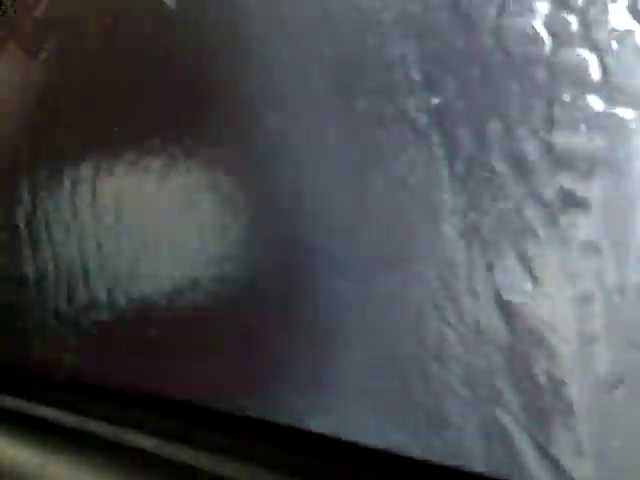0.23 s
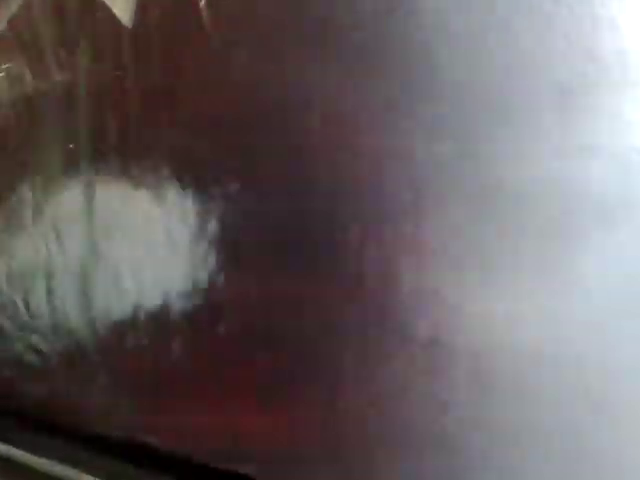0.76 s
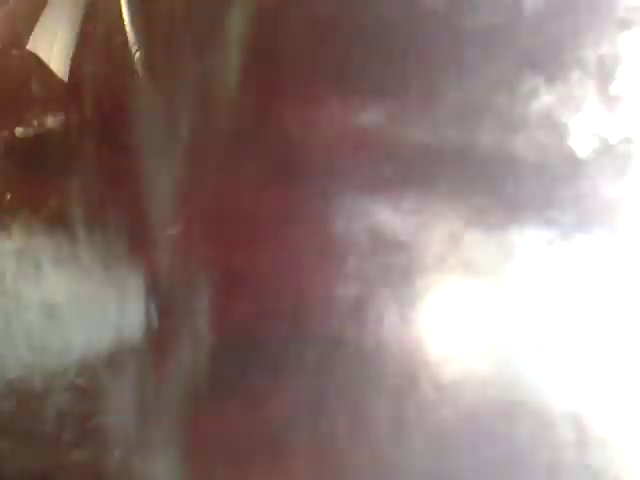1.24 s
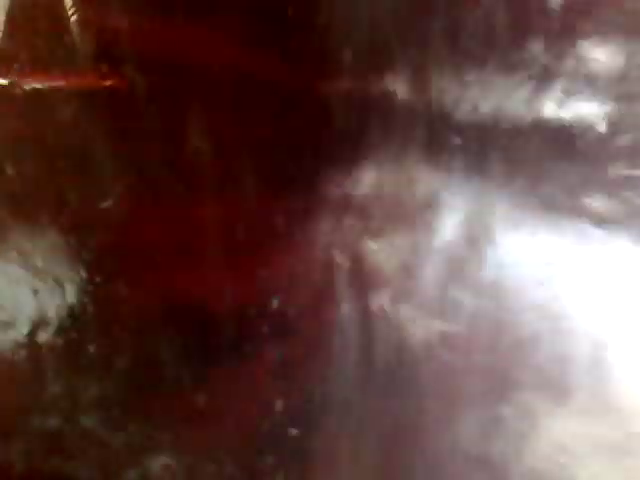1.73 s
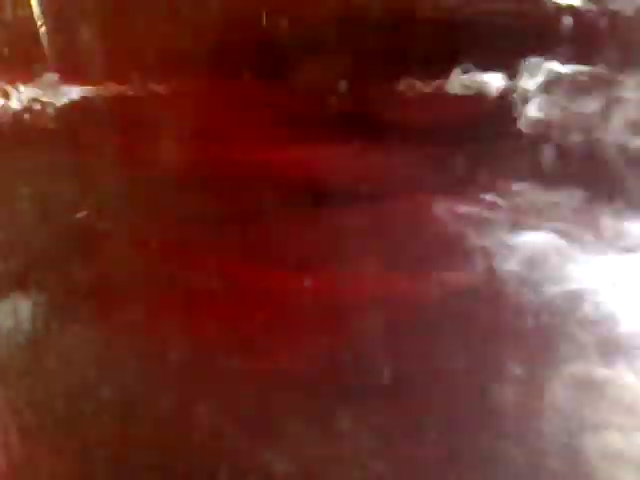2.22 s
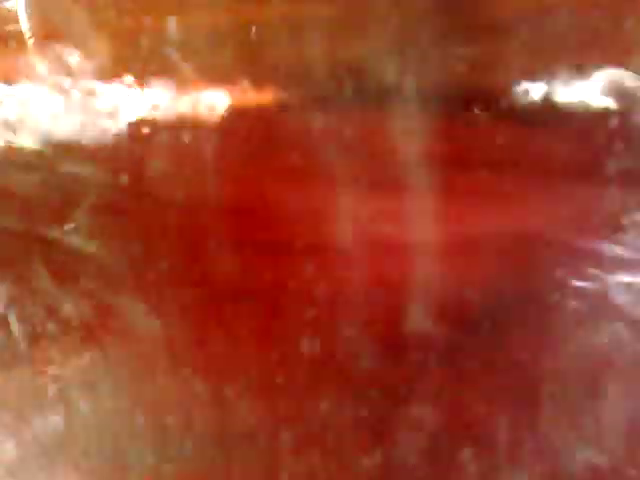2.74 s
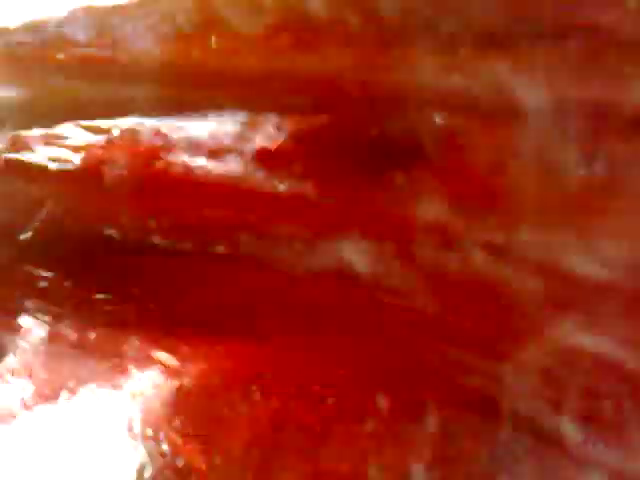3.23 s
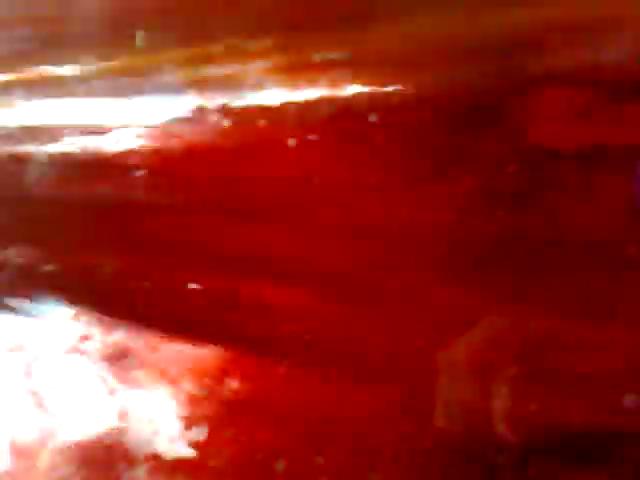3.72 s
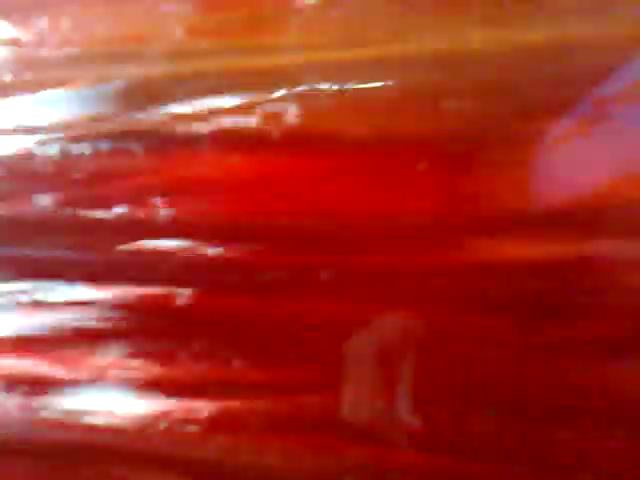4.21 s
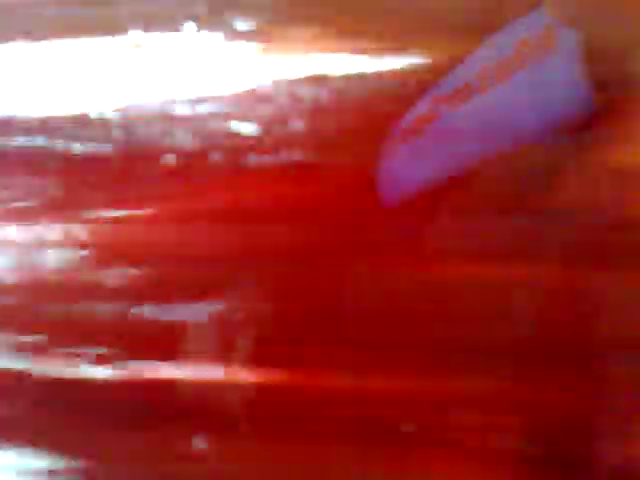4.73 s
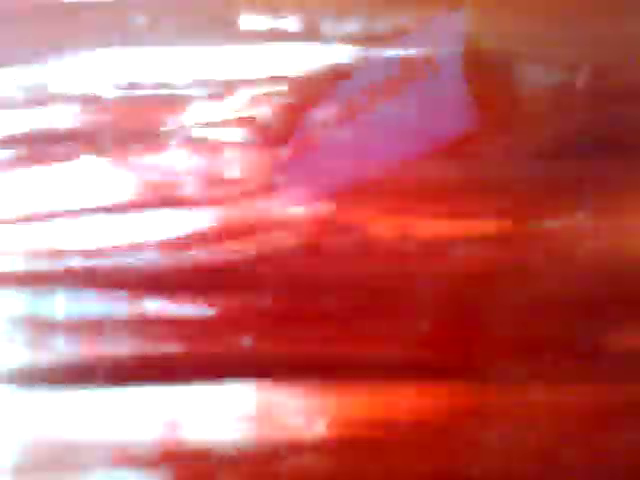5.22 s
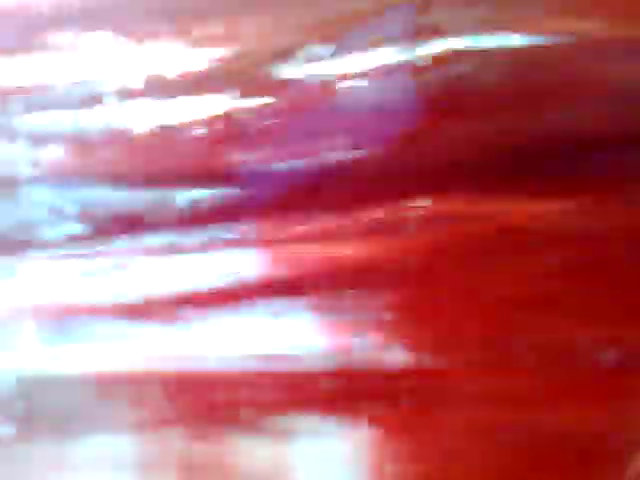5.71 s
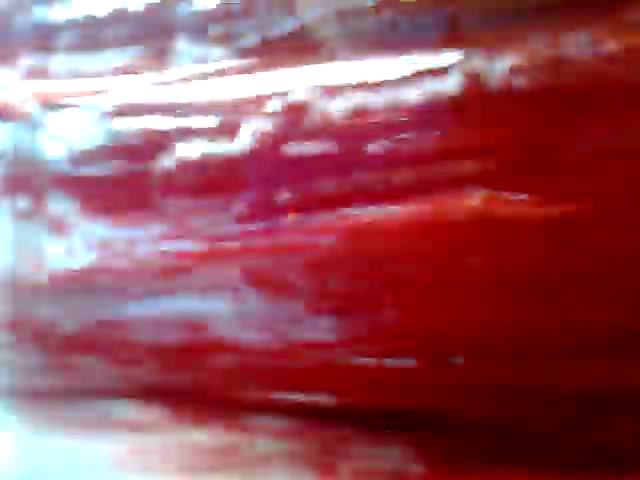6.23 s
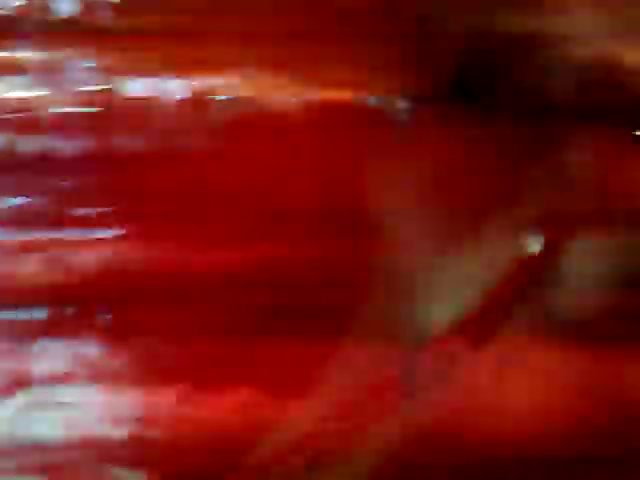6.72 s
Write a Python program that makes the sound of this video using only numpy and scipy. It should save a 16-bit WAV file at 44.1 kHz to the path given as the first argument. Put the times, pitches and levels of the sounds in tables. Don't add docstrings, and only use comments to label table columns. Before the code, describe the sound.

A short roar of water jets cuts out, then a big wet cloth brush scrubs and drums steadily on a car, loud, muffled and overdriven.

```python
import sys
import numpy as np
from scipy import signal
from scipy.fft import rfft, irfft
from scipy.io import wavfile
from scipy.ndimage import uniform_filter1d

SR = 44100
rng = np.random.default_rng(int(sys.argv[2]) if len(sys.argv) > 2 else 0)


def generate_wav(signal):
    frames = np.transpose(np.atleast_2d(signal))
    scaled = np.clip(frames, -1, 1) * 32767
    pcm = np.round(scaled).astype(np.int16)
    wavfile.write(sys.argv[1], SR, pcm)


def amplitude_ratio(level_db):
    exponent = np.asarray(level_db, float) / 20
    return 10 ** exponent


N = 306936
BAND_EDGE_HZ = 3720
SILENT_S, GAP_DB = 0.2405, -72

# t/s, level/dB
PRESSURE = [(0.3, 0), (1.4, -0.5), (1.85, -0.5), (2.15, -3), (2.4, -4), (2.66, 0), (3.1, 0), (3.4, 1),
            (4.1, 1), (4.42, -4.5), (4.66, 0.5), (5.2, -0.5), (6.0, 0), (6.19, 2.5), (6.33, 0), (6.7, 0.5),
            (6.85, 2.5), (6.96, -2)]


def rms_one(x):
    return x / np.sqrt(np.mean(x ** 2) + 1e-20)


def in_time(rows):
    s, *columns = np.transpose(rows)
    return [np.interp(np.arange(N) / SR, s, c) for c in columns]


def ramp(start, end):
    return np.clip((np.arange(N) / SR - start) / (end - start), 0, 1)


def drift(rate):
    r = np.exp(-80 * np.pi * rate / SR)
    noise = rng.standard_normal(N // 40 + 2002)
    slow = signal.lfilter([1], [1, -2 * r, r * r], noise)[2000:]
    return np.interp(np.arange(N) / 40, np.arange(len(slow)), rms_one(slow))


def coloured(x, spectrum, patchy_db, patch_rate):
    hz, points = np.arange(N // 2 + 1) * SR / N + 1, np.array(spectrum)
    level_db = np.interp(np.log(hz), np.log(points[:, 0]), points[:, 1], -90, -90)
    bins = rfft(x) * amplitude_ratio(level_db)
    group = np.round(3 * np.log2(hz)).astype(int) % 4
    out = 0
    for k in range(4):
        out = out + amplitude_ratio(patchy_db * drift(patch_rate)) * irfft(bins * (group == k), N)
    return rms_one(out)


def resonate(x, peaks):
    out = 0
    for k, (hz, width, db) in enumerate(peaks):
        r = np.exp(-np.pi * width / SR)
        b, a = [1, 0.0035, -1], [1, -2 * r * np.cos(2 * np.pi * hz / SR), r * r]
        ringing = signal.lfilter(b, a, signal.lfilter(b, a, x))
        out = out + (-1) ** k * amplitude_ratio(db) * rms_one(ringing)
    return rms_one(out)


def patter(per_s, spread_db, hiss):
    sizes = amplitude_ratio(spread_db * np.minimum(rng.exponential(1, N), 5)) * rng.choice([-1, 1], N)
    contacts = sizes * (rng.random(N) < per_s / SR)
    return rms_one(contacts) + hiss * rng.standard_normal(N)


def pumps():
    # f/Hz, level/dB per Hz
    pump_colour = [(12, -6.5), (25, -5.5), (45, -3), (80, -9), (160, -39)]
    return amplitude_ratio(-32) * coloured(rng.standard_normal(N), pump_colour, patchy_db=-2.0, patch_rate=3)


def jets():
    # f/Hz, level/dB per Hz
    jet_colour = [(25, -19), (60, -13.5), (140, -0.5), (400, -2), (600, -4.5), (750, -1), (1100, -7.5),
                  (1900, -11), (2500, -14.5), (3100, -6.5), (3500, -3.5), (4400, -36.5)]
    roar = coloured(patter(6000, spread_db=1.5, hiss=1.0), jet_colour, patchy_db=2.5, patch_rate=45)
    return amplitude_ratio(-7) * roar


def drops():
    # t/s, peak level/dB
    drop_hits = [
        (0.2915, -3),
        (0.4395, -3),
        (5.908, -1),
        (6.67, -2),
    ]
    hits = np.zeros(N)
    for s, db in drop_hits:
        hits[round(s * SR)] = -amplitude_ratio(db)
    return np.convolve(hits, np.hanning(15), "same")


def drones():
    # t/s, length/s, f/Hz, rms level/dB
    hums = [
        (.58, .18, 150, -19),
        (1.47, .5, 146, -17),
        (1.68, .3, 180, -19),
        (.4, .55, 262, -18),
        (1.5, .5, 270, -18),
        (3.05, .4, 147, -19),
        (3.2, .65, 100, -21),
        (4.52, .33, 113, -18),
        (5.05, 2.0, 330, -16),
    ]
    edge_s, wander, throb_db, trim_db = 0.06, 0.035, 2.5, -0.5
    out = 0
    for s, length, hz, db in hums:
        dwell = ramp(s - edge_s, s) - ramp(s + length, s + length + edge_s)
        phase = 2 * np.pi * np.cumsum(hz * (1 + wander * drift(12))) / SR
        level = amplitude_ratio(db + trim_db + throb_db * drift(8))
        out = out + level * dwell * np.sqrt(2) * np.sin(phase)
    return out


def along_car():
    # arrival t/s, frame level/dB, cabin level/dB, door level/dB, pane level/dB
    stretches = [
        (0.0, -26.5, -10.5, -15, -13.5),
        (2.001, -18, -12.5, -16, -14),
        (4.65, -20.5, -11.5, -12.5, -15),
        (5.15, -20.5, -14, -13.5, -17),
        (5.7, -22, -18.5, -10.5, -20),
    ]
    handover_s = 0.2
    rows = np.array(stretches)
    levels = rows[0, 1:, None]
    for before, after in zip(rows[:-1], rows[1:]):
        rise = ramp(after[0] - handover_s / 2, after[0] + handover_s / 2)
        levels = levels + np.outer(after[1:] - before[1:], rise)
    return levels


def body():
    # f/Hz, level/dB per Hz
    rumble_colour = [(35, -25), (57, -4), (72, -7), (100, 2.5), (130, -2), (300, -17.5)]
    # f/Hz, width/Hz, level/dB
    cabin_peaks = [(147.2, 47, -1.5), (195.7, 60, -1), (257, 80, 4.5)]
    door_peaks = [(318.4, 74, 2), (373, 196, -5.5)]
    pane_peaks = [(705, 157, 5.5), (606, 160, -5)]
    follows = [0.46, 0.7, 0.74, 1.5]
    rumble_db, boom_db, door_db, pane_db = along_car() + np.outer(follows, in_time(PRESSURE)[0])
    rumble = coloured(rng.standard_normal(N), rumble_colour, patchy_db=-4.0, patch_rate=18)
    boom = amplitude_ratio(boom_db + 0.28 * drift(4.5)) * resonate(rng.standard_normal(N), cabin_peaks)
    door = amplitude_ratio(door_db + 1.2 * drift(24)) * resonate(rng.standard_normal(N), door_peaks)
    pane = amplitude_ratio(pane_db + 0.77 * drift(23)) * resonate(rng.standard_normal(N), pane_peaks)
    return amplitude_ratio(rumble_db) * rumble + boom + door + pane


def strip_beat():
    # t/s, rows passing/Hz
    strip_rate = [(0, 22.42), (2.5, 22.42), (4.5, 22.6), (6.96, 22.62)]
    rate = in_time(strip_rate)[0]
    phase = -2.05 + 2 * np.pi * (np.cumsum(rate) - rate[0]) / SR
    return np.cos(phase) * (1 + 0.4 * drift(5))


def splashes():
    # middle t/s, length/s, swell level/dB
    sheets = [(0.465, 0.25, 1.5), (1.106, .3, 0.5), (2.58, 0.32, 3), (2.766, 0.14, 2.5), (3.003, 0.12, 2),
              (5.01, .12, 2), (1.663, 0.11, 3), (1.274, .15, 1.5), (4.145, .2, 0.5), (5.498, 0.61, 1.5),
              (5.714, 0.15, 3), (5.88, .12, 2), (6.135, .05, 7.5), (6.554, 0.41, 2.5)]
    swell_db = 0
    for s, length, db in sheets:
        swell_db = swell_db + db * np.minimum(ramp(s - length / 2, s), 1 - ramp(s, s + length / 2))
    return swell_db


def brush():
    # f/Hz, level/dB per Hz
    scrub_colour = [(220, -33.5), (380, 1.5), (542, -0.5), (704, -5), (861, -2.5), (1170, -2), (1360, -7.5),
                    (2400, -16.5), (3120, -43), (5280, -120)]
    spray_colour = [(880, -30.5), (1500, -2.5), (2370, -6.5), (3220, 0.5), (3400, 5.5), (4420, -21),
                    (7480, -120)]
    splash_db = splashes()
    scrub_db = -10 - 0.3648 * np.arange(N) / SR + 0.7 * splash_db
    spray_db = -17.5 - 0.4 * in_time(PRESSURE)[0] + splash_db
    beat, surge = strip_beat(), drift(14)
    scrub = coloured(patter(3000, spread_db=4.0, hiss=1.33), scrub_colour, patchy_db=0.6, patch_rate=26)
    spray = coloured(patter(4500, spread_db=0.5, hiss=0.89), spray_colour, patchy_db=0.2, patch_rate=24)
    scrub = amplitude_ratio(scrub_db + 0.96 * beat + 0.3 * surge) * scrub
    return scrub + amplitude_ratio(spray_db + 0.61 * beat + 0.65 * surge) * spray


def slaps():
    # t/s, peak level/dB
    hard_slaps = [(.081, -8), (0.12, -3), (0.156, -7.5), (.17, -3), (0.288, -18.5), (0.4362, -3.5),
                  (0.626, -1.5), (1.3008, -9), (2.03, -11), (2.236, -10.5), (2.738, -4), (3.318, -6.5),
                  (3.9981, -9.5), (4.416, -7.5), (5.45, -9.5), (5.906, -5), (6.127, -13.5),
                  (6.2663, -14.5), (6.67, -7)]
    hits = np.zeros(N)
    for s, db in hard_slaps:
        hits[round(s * SR)] = amplitude_ratio(db)
    shape = signal.lfilter([1], [1, -np.exp(-1 / (0.003 * SR))], hits + 1e-18)
    splat_band = signal.butter(2, [400, 3400], "band", fs=SR, output="sos")
    return shape * rms_one(signal.sosfilt(splat_band, rng.standard_normal(N)))


def scene():
    first = np.arange(N) < SILENT_S * SR
    rise = ramp(0.2585, 0.375)
    second = rise + amplitude_ratio(-27) * (rise > 0) * (1 - rise) + amplitude_ratio(GAP_DB) * ~first
    second = second * (1 - ramp(N / SR - 0.003, N / SR))
    brush_shot = pumps() + body() + brush() + drones()
    return (first * jets() + second * brush_shot + slaps() + drops())[None]


def smear(x):
    high_pass = signal.cheby2(10, 60, BAND_EDGE_HZ, "high", fs=SR, output="sos")
    above = signal.sosfilt(high_pass, x)[0]
    colour = uniform_filter1d(np.abs(rfft(above)), size=2000)
    noise = rms_one(irfft(colour * rfft(rng.standard_normal(N)), N))
    half = round(0.025 * SR / 2)
    level = uniform_filter1d(uniform_filter1d(above ** 2, half), half)
    return amplitude_ratio(-6) * np.sqrt(np.maximum(level, 0)) * noise


def limiter(band):
    knee, slope = 0.5, 0.87
    size = np.abs(band)
    over = np.maximum(size - knee, 0) / (1 - knee)
    return np.sign(band) * (np.minimum(size, knee) + (1 - knee) * np.tanh(slope * over))


def mirror(band):
    # f/Hz, level/dB
    mirror_leak = [(12450, -70), (12700, -47), (13200, -45), (13700, -60), (14200, -48), (14700, -51),
                   (15050, -61), (15350, -53), (15800, -52), (16000, -58), (16120, -57), (16290, -69),
                   (16700, -55), (17200, -49)]
    hz, leak = np.arange(N // 2 + 1) * SR / N, np.array(mirror_leak)
    shifted = rfft(2 * band * np.cos(2 * np.pi * 16000 * np.arange(N) / SR))
    return shifted * amplitude_ratio(np.interp(hz, leak[:, 0], leak[:, 1], -120))


def band_limit(x):
    return signal.sosfilt(signal.butter(12, 17200, fs=SR, output="sos"), x)


def record(dry):
    band = amplitude_ratio(1) * signal.sosfilt(signal.cheby2(14, 45, BAND_EDGE_HZ, fs=SR, output="sos"), dry)
    band = signal.sosfilt(signal.cheby2(8, 50, 4300, fs=SR, output="sos"), band)
    loud = limiter(band)
    fade_out = np.maximum(1 - ramp(0.223, SILENT_S), amplitude_ratio(GAP_DB))
    fade = np.where(np.arange(N) < (SILENT_S + 0.008) * SR, fade_out, 1)
    band, loud = fade * band, fade * loud
    bins = rfft(loud + smear(loud)) + mirror(band)
    return band_limit(np.clip(irfft(bins, N), -1, 1))


dry = scene()
out = record(dry)
generate_wav(out)
```